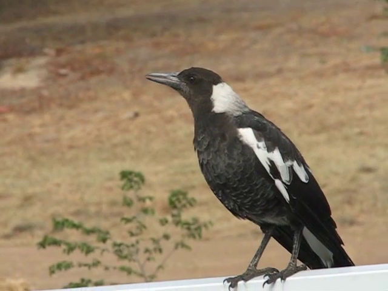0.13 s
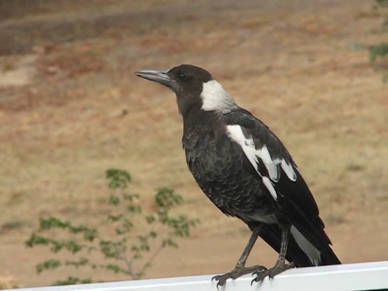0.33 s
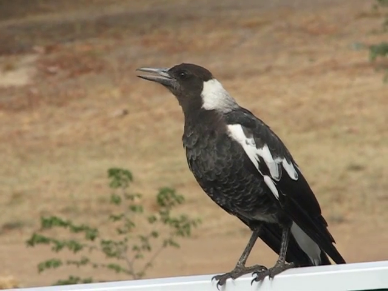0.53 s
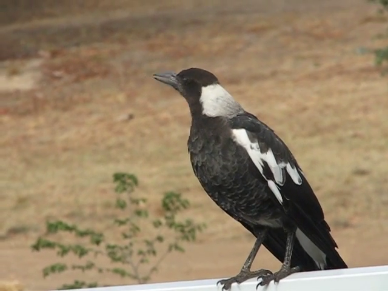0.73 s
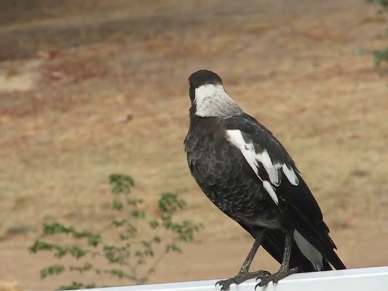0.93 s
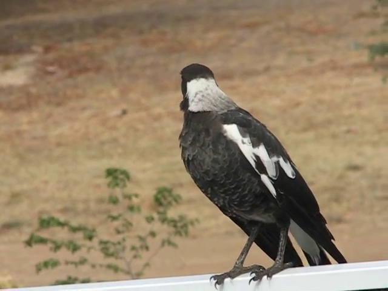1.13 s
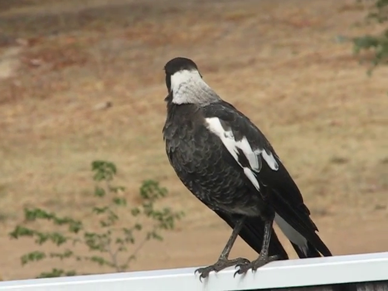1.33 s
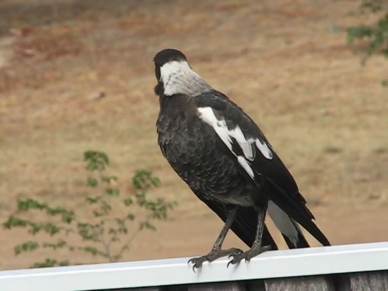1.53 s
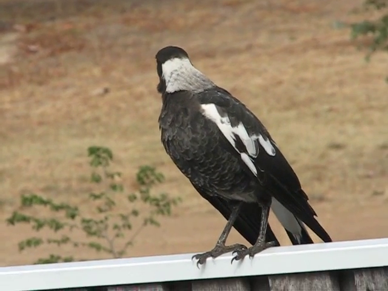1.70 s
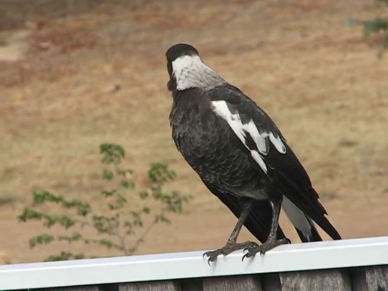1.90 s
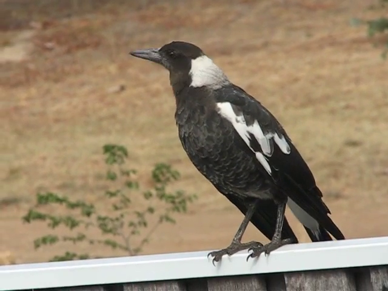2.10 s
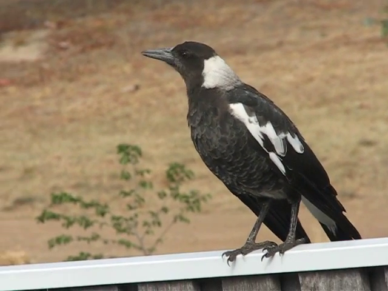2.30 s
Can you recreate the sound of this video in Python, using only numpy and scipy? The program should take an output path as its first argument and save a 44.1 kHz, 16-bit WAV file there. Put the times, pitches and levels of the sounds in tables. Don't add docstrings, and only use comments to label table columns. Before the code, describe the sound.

A magpie warbles clear fluted notes and low burbles outdoors, over soft breeze and distant engine rumble.

```python
import sys
import numpy as np
from scipy import signal
from scipy.fft import rfft, irfft, next_fast_len
from scipy.io import wavfile
from scipy.ndimage import uniform_filter1d, map_coordinates

SR = 44100
rng = np.random.default_rng(int(sys.argv[2]) if len(sys.argv) > 2 else 0)


def pcm_store(signal):
    levels = np.round(np.clip(np.atleast_2d(signal), -1, 1) * 32767)
    wavfile.write(sys.argv[1], SR, levels.astype(np.int16).T)


def level_to_linear(level):
    exponent = np.asarray(level, float) / 20
    return 10 ** exponent


N = 103635
T = np.arange(N) / SR

# t/s, level/dB
CAMERA_GAIN = [(.08, -5.5), (.5, 0.5)]


def unit(x):
    return x / np.sqrt(np.mean(abs(x) ** 2) + 1e-20)


def along(points, hz):
    f, value = np.transpose(points)
    return np.interp(np.log(hz + 1), np.log(f + 1), value)


def curves(rows):
    s, *columns = np.transpose(rows)
    return [np.interp(T, s, column) for column in columns]


def wobble(rate, t=T):
    knots = rng.standard_normal(int(N * 900 / SR))
    return map_coordinates(knots, [t * rate])


def filtered(x, response):
    m = next_fast_len(N + SR // 2)
    return irfft(rfft(x, m) * response(np.fft.rfftfreq(m, 1 / SR)), m)[..., :N]


def tone(hz):
    turns = np.cumsum(hz + 0 * T) / SR + rng.random()
    return np.sqrt(2) * np.sin(2 * np.pi * turns)


def gate(start, end, edge):
    inside = np.minimum(T - start, end - T)
    return np.sin(np.pi / 2 * np.clip(inside / edge + .5, 0, 1)) ** 2


def rush(spectrum, patchy_db):
    # f/Hz, left-right likeness
    likeness = [(60, 0.99), (380, 0.9), (950, 0.7), (3000, 0.066)]
    z = signal.stft(rng.standard_normal((2, N)), nperseg=512)[2]
    patches = uniform_filter1d(rng.standard_normal(z.shape[1:]), 6, 0)
    patches = unit(uniform_filter1d(patches, 14, 1))
    pair = signal.istft(z * level_to_linear(patchy_db * patches), nperseg=512)[1][:, :N]

    def response(hz):
        angle = np.arccos(np.clip(along(likeness, hz), -1, 1)) / 2
        return level_to_linear(along(spectrum, hz)) * [np.cos(angle), np.sin(angle)]

    mid, side = filtered(pair, response)
    return unit(np.array([mid + side, mid - side]))


def syllables(rows):
    swell_db = 3
    return [[(s, a, db - swell_db), (s + d / 2, (a + b) / 2, db), (s + d, b, db - swell_db)]
            for s, d, a, b, db in rows]


def sing(notes, rough, flutter_hz, jitter, breath, bright_db, throat):
    effort_ref_db, brighten = -24, .25
    breath_hz = 400
    drift_hz, drift_db = 45, 3.5
    out = np.zeros(N)
    for note in notes:
        is_open = gate(note[0][0], note[-1][0], .0045)
        on = is_open > 0
        t, (hz, db) = T[on], curves(note)
        hz = uniform_filter1d(hz, size=200)[on] * (1 + jitter * wobble(flutter_hz, t))
        phase = 2 * np.pi * (np.cumsum(hz) / SR + rng.random())
        effort_db = uniform_filter1d(db, size=1500)[on]

        def shaky(k, share, rate):
            steady_part = (1 + share * wobble(rate, t)) * np.sin(k * phase + k * k)
            loose_part = share * wobble(rate, t) * np.cos(k * phase + k * k)
            return (steady_part + loose_part) / np.sqrt(1 + 2 * share ** 2)

        overtones = 0
        for k in range(2, 15):
            size_db = along(throat, k * hz) + drift_db * wobble(drift_hz, t)
            overtones = overtones + level_to_linear(size_db) * shaky(k, breath, breath_hz)
        overtones = overtones * level_to_linear(bright_db + brighten * (effort_db - effort_ref_db) + effort_db)
        fundamental = level_to_linear(uniform_filter1d(db, size=240)[on]) * shaky(1, rough, flutter_hz)
        out[on] += np.sqrt(2) * is_open[on] * (fundamental + overtones)
    return out


def magpie_clear():
    # t/s, f/Hz, level/dB
    fluted = [
        [(.215, 887, -47.5), (.243, 1004, -29), (.262, 1002, -35.5)],
        [(.394, 1200, -34.5), (.408, 1275, -27.5), (.42, 1334, -31), (.453, 1327, -26.5)],
        [(.512, 1402, -32.5), (.53, 1492, -26), (.548, 1410, -29), (.578, 1526, -20.5), (.596, 1542, -33)],
        [(.58, 1183, -22.5), (.598, 1202, -28.5), (.613, 1221, -15.5), (.63, 1162, -26.5), (.652, 1088, -20),
         (.661, 1119, -24), (.674, 1119, -20.5), (.7, 1101, -26.5), (.725, 1086, -30)],
    ]
    # t/s, f/Hz, level/dB
    closing = [
        [(1.942, 986, -33.5), (1.958, 1016, -24), (1.977, 982.6, -32), (2.0, 1009, -20), (2.017, 1048, -28.5),
         (2.032, 1009, -19.5), (2.046, 1027, -34), (2.056, 1003, -29), (2.068, 1000, -44)],
    ]
    # start t/s, length t/s, from f/Hz, to f/Hz,
    # level/dB
    pips = [
        (.482, .034, 950, 975, -33),
        (1.89, .038, 1530, 1490, -42),
        (1.853, .02, 1210, 1280, -41),
        (1.914, .03, 1310, 1180, -36),
        (1.212, .014, 1220, 1200, -41),
        (1.112, .025, 1520, 1510, -47),
    ]
    # f/Hz, level/dB
    beak_open = [(1400, -5), (2250, -23.5), (3300, -27.5), (3650, -45), (4600, -17.5), (5800, -34.5),
                 (8800, -33.5), (14000, -53)]
    beak_narrow = [(2800, -26), (4400, -28.5), (6000, -31), (13000, -58)]
    head_lowered = [(2100, -24.5), (3000, -33), (4100, -24), (5100, -36.5), (9000, -27.5), (14000, -50)]
    near = sing(fluted[:3], .04, 150, .005, .6, 0, beak_narrow)
    near = near + sing(fluted[3:], .02, 120, .004, .4, 2, beak_open)
    near = near + sing(closing, .1, 260, .008, 1.8, 3, head_lowered)
    near = near + sing(syllables(pips[1:]), .2, 200, .01, 1, -1, beak_open)
    return near + sing(syllables(pips[:1]), .15, 200, .008, 1, 9, beak_open)


def magpie_rough():
    # start t/s, length t/s,
    # from f/Hz, to f/Hz, level/dB
    burble = [(-.02, 0.078, 1017, 963, -42), (0, 0.032, 1140, 1240, -47), (.08, .12, 728, 779, -55.5),
              (.255, 0.048, 874, 680, -38), (.3, 0.038, 702, 720, -41.5), (.33, 0.0408, 798, 647, -40),
              (.27, .05, 995, 946, -48), (.915, 0.063, 740, 857, -44.5), (.972, 0.048, 698, 842, -39),
              (1.235, 0.028, 1144, 1100, -53.5), (1.8, 0.051, 1053, 1129, -48.5),
              (.28, 0.1, 1410, 1245, -51.5), (1.83, 0.048, 832, 867, -43.5),
              (1.868, 0.026, 1020, 990, -36.5), (.482, 0.036, 1752, 2194, -41.5),
              (1.89, 0.0413, 810, 725, -41)]
    # t/s, f/Hz, level/dB
    warble = [
        [(.452, 1380, -26), (.462, 1418, -38.5), (.468, 1454, -33.5), (.474, 1506, -22), (.481, 1530, -36),
         (.488, 1590, -29), (.5, 1770, -58)],
        [(1.481, 1248, -38.5), (1.495, 1125, -41), (1.515, 1031, -37.5), (1.532, 1047, -35),
         (1.545, 1012, -40.5), (1.575, 995, -49)],
        [(1.5, 1302, -37), (1.509, 1243, -36), (1.522, 1095, -41), (1.54, 1195, -39), (1.558, 1328, -44),
         (1.577, 1188, -33), (1.589, 1200, -34)],
        [(1.604, 1562, -36), (1.615, 1204, -30.5), (1.625, 1077, -38), (1.637, 1122, -33), (1.652, 1409, -43.5),
         (1.67, 1190, -45), (1.686, 1080, -55)],
        [(1.695, 1650, -48), (1.712, 1350, -38), (1.73, 1372, -33), (1.745, 1200, -41), (1.757, 1030, -44)],
        [(1.762, 1053, -34), (1.768, 1037, -31), (1.774, 1054, -41), (1.78, 1103, -31), (1.787, 1060, -51),
         (1.793, 1050, -33), (1.8, 1050, -45)],
        [(1.8, 686, -45), (1.82, 790, -37), (1.834, 699, -39.5), (1.846, 619, -37.5), (1.86, 630, -41),
         (1.888, 628, -50)],
        [(1.963, 1300, -37), (1.975, 1477, -38.5), (1.987, 1168, -32.5), (2.003, 1421, -45), (2.02, 1203, -36),
         (2.06, 1250, -62)],
    ]
    # t/s, f/Hz, level/dB
    murmur = [
        [(.945, 981, -40), (.955, 1004, -44), (.962, 1034, -51), (.972, 1018, -41.5), (1.005, 1022, -46),
         (1.025, 939, -53), (1.04, 923, -36), (1.055, 850, -47)],
        [(1.059, 1400, -44.5), (1.071, 1245, -40.5), (1.08, 1460, -41), (1.085, 1480, -42)],
        [(1.082, 973, -40), (1.093, 1019, -35.5), (1.108, 887, -49), (1.125, 758, -41), (1.14, 889, -49),
         (1.16, 872, -46.5), (1.19, 765, -46), (1.205, 693, -46.5)],
        [(2.133, 722, -39), (2.147, 670, -40.5), (2.165, 800, -40.5), (2.172, 820, -52), (2.19, 990, -54)],
        [(2.195, 992, -37.5), (2.203, 1001, -35.5), (2.216, 1056, -47), (2.227, 1040, -44), (2.24, 1060, -49)],
    ]
    # f/Hz, level/dB
    beak_open = [(1400, -5), (2250, -23.5), (3300, -27.5), (3650, -45), (4600, -17.5), (5800, -34.5),
                 (8800, -33.5), (14000, -53)]
    burbling = sing(syllables(burble), .8, 260, .02, 2, -3, beak_open)
    return burbling + sing(warble + murmur, .33, 260, .012, 2, -2, beak_open)


def walls(x, delay_s):
    # f/Hz, time to fall 60 dB t/s
    dying_time = [(1200, 0.25), (6000, 0.056)]
    hz, t, z = signal.stft(rng.standard_normal((2, SR // 2)), SR, nperseg=256)
    tail = signal.istft(z * level_to_linear(-60 * t / along(dying_time, hz)[:, None]), SR, nperseg=256)[1]
    tail[1] = 0.51 * (tail[0] + tail[1])
    late = np.pad(x, (int(delay_s * SR), 0))
    return signal.fftconvolve(late[None], tail / np.linalg.norm(tail[0]), axes=1)[:, :N]


def small_birds():
    chirps = [
        (0.236, 0.023, 7130, 6880, -55),
        (.87, 0.069, 4620, 3870, -54.5),
        (0.964, 0.047, 4300, 3890, -55),
        (1.83, 0.057, 7900, 7350, -49.5),
        (1.926, 0.011, 3930, 4950, -46),
        (1.936, .025, 4800, 4800, -47.5),
        (2.035, 0.038, 5850, 5250, -55),
        (2.037, 0.017, 5250, 5030, -47.5),
        (2.043, .02, 2800, 3840, -54.5),
        (2.114, 0.055, 4950, 4480, -56),
    ]
    out = np.zeros(N)
    for s, d, a, b, db in chirps:
        whistle = tone(np.interp(T, [s, s + d], [a, b]) + 100 * wobble(160))
        flutter = (1 + .7 * wobble(300)) / 1.2
        out += level_to_linear(db) * gate(s, s + d, .006) * flutter * whistle
    return out


def fuzzy(rows):
    out = np.zeros(N)
    for hz, width, db in rows:
        out += level_to_linear(db) * unit(tone(hz) * (1.28 + wobble(width)) + tone(hz) * wobble(width))
    return out


def traffic():
    # t/s, f/Hz
    engine = [(0, 76.7), (1.4, 76.7), (2.0, 74.7)]
    # t/s, level/dB
    other_engine = [(0, -58), (.45, -49), (1.35, -50), (1.7, -62)]
    # t/s, level/dB
    passing = [(.6, -4), (1.25, 2.5), (2.35, -2)]
    # f/Hz, width f/Hz, level/dB
    hums = [(99.6, 3, -62)]
    drones = [(212.8, 12, -50.5), (250.5, 17, -52.5), (289.1, 4.95, -53.5)]
    # f/Hz, level/dB
    rumble = [(25, -19.5), (60, 1), (260, 3), (330, -3.5), (480, -35.5)]
    engine_db, other_hz = -46.5, 68.85
    (hz,), (other_db,), (swell_db,) = curves(engine), curves(other_engine), curves(passing)
    first = np.cos(2 * np.pi * (np.cumsum(hz) / SR + .73)) * level_to_linear(engine_db)
    second = np.cos(2 * np.pi * other_hz * T) * level_to_linear(other_db)
    octave = level_to_linear(engine_db - 20) * tone(2 * hz)
    hum = np.sqrt(2) * (first + second) + octave + fuzzy(hums) + level_to_linear(swell_db) * fuzzy(drones)
    return hum + level_to_linear(-47 + 0.17 * swell_db) * rush(rumble, patchy_db=-1.0)


def breeze():
    # f/Hz, level/dB
    air = [(210, -34), (350, -8), (966, -3), (1080, -5), (1580, -7), (8090, -16.5), (15500, -40.5)]
    # t/s, level/dB
    swell = [(0, 0.5), (.55, 1), (.9, 0), (1.35, -0.5), (1.7, 0.5), (2.0, 0), (2.35, 0)]
    return level_to_linear(-47 + curves(swell)[0]) * rush(air, patchy_db=0.83)


def tape_drive():
    # f/Hz, left level/dB, right level/dB
    whine = [
        (7867.2, -62, -59),
        (8265.05, -66, -53),
    ]
    heads = np.sign(np.sin(np.pi * 29.97 * T))
    return sum(level_to_linear(np.array([[left], [right]])) * tone(hz) * heads for hz, left, right in whine)


def zoom_motor():
    runs = np.array([
        (0, 12150, 1295),
        (.19, 12600, 1502),
        (.48, 12600, -3.5),
        (.71, 11800, 895.5),
        (1.2, 12500, 1199),
        (1.7, 12100, 0),
        (2.23, 13000, 0),
    ])
    run = np.searchsorted(runs[:, 0], T, "right").clip(1) - 1
    start, hz, drift = runs[run].T
    motor = tone(hz + drift * (T - start) + 110 * wobble(370)) * level_to_linear(-69 + 5.5 * wobble(7.8))
    return motor * level_to_linear([[0], [-15]])


def scene():
    # f/Hz, level/dB
    leaning = [(2500, -1.5), (13000, -1.5)]
    near, away, far = magpie_clear(), magpie_rough(), small_birds()
    gain = level_to_linear(curves(CAMERA_GAIN)[0])
    far_wall = level_to_linear(-24) * np.roll(near, int(.112 * SR))
    direct = (near + far_wall + level_to_linear(1.34) * away + far) / gain
    answer = walls((level_to_linear(-17.5) * near + level_to_linear(-8) * away + level_to_linear(-1) * far) / gain, .012)

    def lag(hz):
        return np.exp(-1j * np.pi * hz * 2.38 / SR * np.array([[1], [-1]]))

    def lean(hz):
        return level_to_linear(along(leaning, hz) * np.array([[.5], [-.5]]))

    outdoors = filtered(filtered(direct, lag) + answer + breeze(), lean)
    return outdoors + traffic() + tape_drive() + zoom_motor()


def top_cut(x):
    return signal.sosfilt(signal.butter(12, 15660, fs=SR, output="sos"), x)


def record(dry):
    mix = dry * level_to_linear(curves(CAMERA_GAIN)[0])
    return top_cut(mix)


dry = scene()
out = record(dry)
pcm_store(out)
```